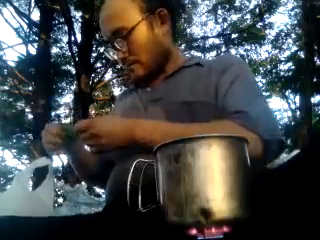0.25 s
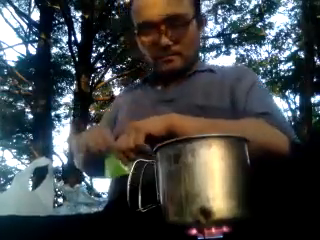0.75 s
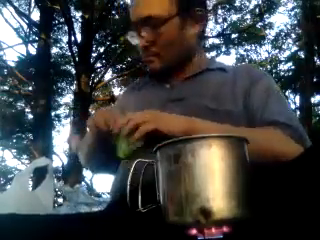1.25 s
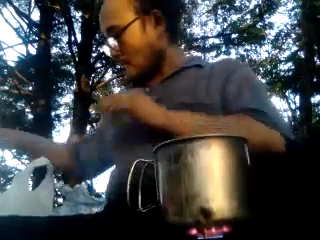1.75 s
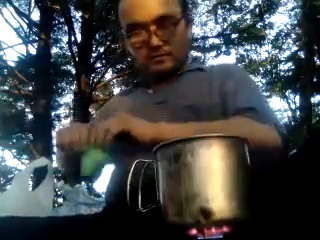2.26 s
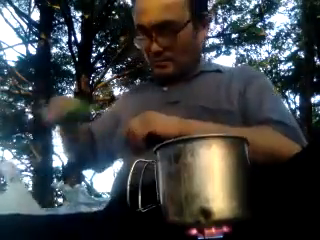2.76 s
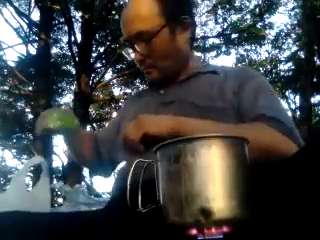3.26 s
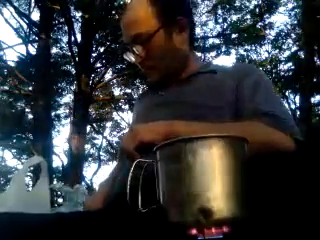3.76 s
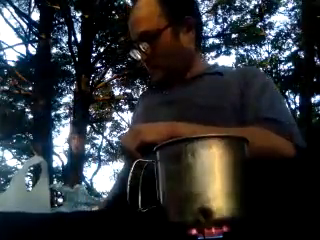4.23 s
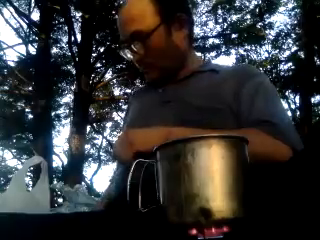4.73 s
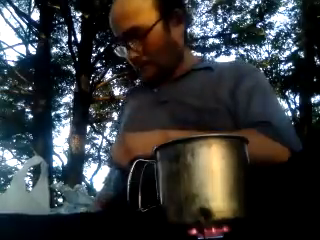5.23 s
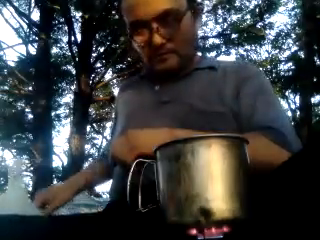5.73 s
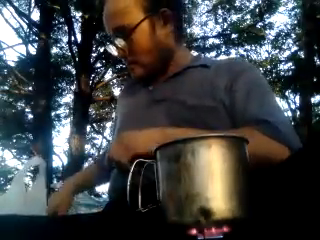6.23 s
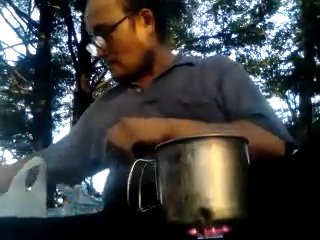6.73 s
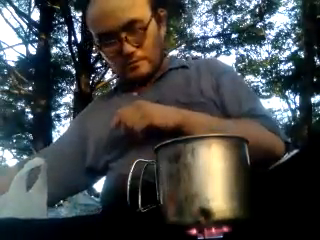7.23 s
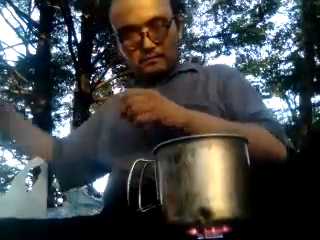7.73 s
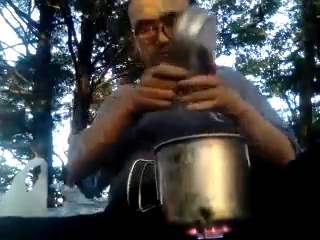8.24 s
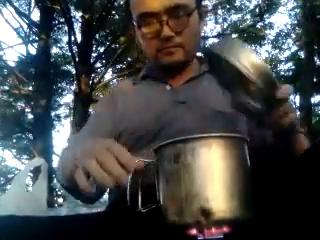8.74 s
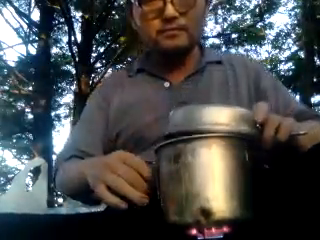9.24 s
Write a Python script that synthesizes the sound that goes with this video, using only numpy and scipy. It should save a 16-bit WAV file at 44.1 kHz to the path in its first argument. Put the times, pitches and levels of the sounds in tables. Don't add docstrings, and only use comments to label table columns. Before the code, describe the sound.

Steady fluttering stove roar with thin gas hiss; crisp foil crackling bursts early, a pause, then light metallic taps and a lid set down.

```python
import sys
import numpy as np
from scipy import signal
from scipy.fft import rfft, irfft, next_fast_len
from scipy.io import wavfile
from scipy.ndimage import uniform_filter1d, minimum_filter1d, map_coordinates

SR = 44100
rng = np.random.default_rng(int(sys.argv[2]) if len(sys.argv) > 2 else 0)


def materialize(psi):
    bounded = np.clip(np.atleast_2d(psi).T, -1, 1)
    quanta = np.round(bounded * 32767).astype(np.int16)
    wavfile.write(sys.argv[1], SR, quanta)


def natural_amplitude(level_db):
    exponent = np.asarray(level_db, float) / 20
    return 10 ** exponent


N = 418068

# pitch_hz, left_db (per Hz), right_db (per Hz), likeness (0-1), right_lead_rad
FLAME_ROAR = [(15, -80, -79, .95, -2.9), (43, -65, -64, 0.95, -2.9), (215, -58, -56, 0.95, -2.9),
              (345, -59, -56, 0.96, -2.8), (475, -68, -65, 0.89, -3.2), (590, -66, -66, 0.99, -3.1),
              (690, -65, -66, 0.93, -2.85), (775, -66, -68, 0.85, -2.6), (950, -64, -63, 0.83, -1.7),
              (1080, -68, -61, 0.78, -1.5), (1250, -82, -67, 0.01, -1.7), (1380, -78, -79, 0.16, -4.4),
              (1510, -73, -73, 0.71, -6.9), (1680, -74, -68, 0.68, -7.2), (2000, -88, -74, 0.22, -5.7),
              (2300, -89, -88, 0.49, -3.1)]
JET_HISS = [(2300, -89, -88, 0.49, -3.1), (2580, -88, -88, 0.76, -3.1), (2900, -82, -81, 0.71, -2.8),
            (3200, -86, -82, 0.34, -0.8), (3450, -84, -74, 0.53, -1.6), (3700, -85, -74, 0.13, -3.9),
            (3950, -83, -72, 0.1, -3.4), (4200, -88, -88, 0.5, -6.2), (4350, -77, -77, 0.93, -3.1),
            (4650, -69, -67, 0.92, -3.0), (4950, -77, -74, 0.6, -2.8), (5150, -79, -69, 0.59, -2.3),
            (5400, -83, -75, 0.38, -2.0), (5750, -91, -74, 0.23, -2.2)]
JET_HISS_UPPER = [(5750, -91, -74, 0.23, -2.2), (6050, -82, -74, 0.4, -2.5), (6450, -92, -71, 0.16, -2.6),
                  (6750, -84, -74, 0.49, -3.0), (6980, -84, -70, 0.62, -2.6), (7150, -85, -81, 0.13, -1.9),
                  (7300, -90, -71, 0.34, -1.7), (7650, -87, -74, 0.39, -2.6), (8000, -95, -70, 0.15, -1.6),
                  (8300, -101, -79, 0.04, -4.4), (8600, -101, -81, 0.03, -1.6), (8950, -101, -88, 0.0, 0.3),
                  (9250, -110, -88, 0.12, 1.8), (9600, -110, -94, 0.06, 1.7)]
# start_s, roar_db, jet_db
BURN_LEVELS = [
    (0.0, 0.5, 1.5),
    (9.48, 0.5, 1.5),
]
# start_s, turn_rad
BODY_LEAN = [(0, 0.67), (1, 0.62), (2.2, 0.72), (3.3, 0.92), (3.8, 0.3), (4.5, 0.23), (5.05, 0.32),
             (5.5, .7), (6.5, .7), (7.5, 0.85), (8.4, 1), (8.7, 0.83), (9.48, .8)]
# pitch_hz, left_db, right_db
FILM_COLOUR = [(670, -68, -80.5), (1230, -66.5, -75), (2027, -75.5, -63.5), (2890, -71.5, -67),
               (3520, -66, -64.5), (4440, -67, -60), (4940, -80.5, -63), (6700, -79, -64.5),
               (7690, -89, -61.5), (8210, -83.5, -61), (8430, -98, -67), (9000, -108, -69),
               (9430, -100, -74), (10210, -117, -95.5)]
# start_s, peak_db, length_ms
CREASES = [(0.0035, -24.5, 1.2), (0.0193, -14.5, 1.17), (0.0293, -23, 1.5), (0.0341, -22, 0.8),
           (0.0469, -19.5, 0.74), (0.0557, -27, 1), (0.0595, -18, 1), (0.0636, -28, 1.2), (0.0697, -32, 0.66),
           (0.0829, -24, 1.0), (0.0915, -19, 2.4), (0.2892, -22.5, 2.1), (0.3443, -31, 1.3),
           (0.6053, -25, 1.2), (0.6213, -16.5, 1.3), (0.63, -28, 0.8), (0.6951, -26, 0.74),
           (0.8909, -29, 1.2), (0.8994, -28, 0.86), (0.9123, -24, 0.9), (0.9657, -21, 0.9),
           (1.0072, -22.5, 1.6), (1.0163, -35, 0.72), (1.0259, -31, 0.9), (1.0475, -31.5, 0.99),
           (1.0514, -26, 1.1), (1.0605, -16.5, 0.92), (1.0779, -23, 0.8), (1.0811, -27, 1.5),
           (1.1034, -19, 0.9), (1.1245, -25, 0.8), (1.1289, -30, 1.9), (1.1357, -17, 1.2),
           (1.1402, -23, 0.93), (1.1966, -24, 1.8), (1.2016, -24, 1.3), (1.3369, -25, 0.8),
           (1.3512, -30, 1.5), (1.3624, -13.5, 2), (1.4951, -21.5, 1.15), (1.5285, -28, 1.2),
           (1.5326, -20.5, 2.3), (1.5456, -25, 1.3), (1.5609, -33, 1.0), (1.5964, -17, 1.1),
           (1.604, -23, 2.4), (1.7381, -28, 1.3), (1.7503, -27, 2.5), (1.801, -19.5, 1.2),
           (1.8635, -17.5, 1.4), (1.9333, -24.5, 2), (1.9454, -25, 1.1), (1.9512, -22.5, 1.1),
           (1.9718, -13, 0.97), (1.9852, -18.5, 1.5), (1.9962, -17, 1.4), (2.0234, -30, 1.9),
           (2.0306, -24, 0.93), (2.1123, -27.5, 1.3), (2.1198, -28, 1.4),
           (2.223, -31, 1.2), (2.2684, -14.5, 1.1), (2.277, -27, 1.5), (2.2918, -24, 0.53),
           (2.2972, -31, 0.9), (2.2995, -23.5, 2.2), (2.3074, -22, 1.8), (2.3159, -16.5, 1.2),
           (2.3245, -20, 0.97), (2.3382, -22, 2.4), (2.348, -17, 1.6), (2.359, -23, 2), (2.3775, -26, 1.7),
           (2.396, -30, 1.5), (2.4257, -16.5, 1.0), (2.5073, -25.5, 1.8), (2.5176, -21.5, 1.5),
           (2.5397, -33, 1.7), (2.5748, -30, 0.8), (2.5912, -24.5, 0.81), (2.601, -27, 1.8),
           (2.6081, -22, 1), (2.6138, -19.5, 0.73), (2.62, -16, 0.47), (2.6267, -32, 1.0),
           (2.6311, -14.5, 0.8), (2.6372, -18.5, 2), (2.652, -28, 1.9), (2.6876, -30, 2.2),
           (2.6988, -19, 1.4), (2.7068, -10.5, 1.2), (2.7103, -13, 1.2), (2.717, -14, 1),
           (2.7888, -12.5, 1.1), (2.7969, -15.5, 1.7), (2.8061, -5.5, 2.6), (2.8599, -14, 0.37),
           (2.863, -12.5, 1.2), (2.8689, -13, 4.2), (2.881, -22, 2.2), (2.893, -20, 2.3),
           (2.938, -27, 0.8), (2.9468, -33, 1.3), (2.9614, -27.5, 0.97), (2.9639, -24, 1.3),
          (2.9687, -19.5, 0.8), (2.9747, -20, 0.8), (2.9813, -20.5, 1.2), (2.9838, -18, 2.5),
          (2.9947, -14, 1.0), (3.0046, -31.5, 1.2), (3.0132, -26, 2.2), (3.017, -27, 0.9),
          (3.0243, -23.5, 0.8), (3.034, -25, 0.8), (3.0455, -23, 1.6), (3.0513, -18.5, 2.4),
          (3.0577, -16, 0.66), (3.0682, -17, 1.0), (3.0876, -26, 1.7), (3.0917, -30, 1.1),
          (3.0982, -25, 1.2), (3.105, -28, 0.81), (3.157, -25, 0.97), (3.1861, -21, 3.4),
          (3.1973, -18, 1.2), (3.2086, -21, 0.8), (3.2633, -18.5, 0.9), (3.2684, -17.5, 0.88),
          (3.2711, -12.5, 2.0), (3.2813, -13, 3.3), (3.2903, -11, 0.72), (3.2941, -9, 0.83),
          (3.297, -20, 1.2), (3.309, -32, 1.0), (3.3516, -14, 0.78), (3.3669, -20, 1.4),
          (3.372, -28.5, 0.8), (3.39, -22, 1.3), (3.3953, -19.5, 0.8), (3.4026, -20.5, 1.2),
          (3.408, -28, 0.9), (3.4221, -31, 1.2), (3.522, -24, 0.73), (3.5282, -26.5, 1), (3.5392, -27, 1.4),
          (3.57, -22.5, 1), (3.577, -27, 1), (3.5913, -28, 1.1), (3.601, -28.5, 1.3), (3.732, -22.5, 1.3),
          (3.7436, -35, 1.3)]
# start_s, peak_db, length_ms
TICKS = [(7.1251, -23, 1.2), (7.1423, -29, 0.72), (7.1477, -26, 0.95), (7.1516, -34, 1.2),
         (7.4021, -15, 0.77), (7.4104, -21, 0.99), (7.4177, -28, 0.71), (7.4267, -28, 1.2),
         (7.4329, -29, 1.1), (7.5654, -25.5, 1.16), (7.71, -23.5, 1.5), (7.7819, -27, 0.7),
         (7.7883, -22, 1.2), (7.7922, -25, 1.1), (7.809, -26, 2.4), (7.8509, -25, 1.8), (7.8581, -24, 1.16),
         (7.9573, -28, 0.99), (7.9707, -22.5, 0.75), (7.9969, -27, 1), (8.1077, -24, 1.5),
         (8.1864, -33, 1.6), (8.1926, -28, 1), (8.198, -34, 0.83), (8.2375, -19.5, 3.3),
         (8.2493, -25.5, 0.74), (8.2706, -27, 1.2), (8.275, -27.5, 1.5), (8.3526, -27, 1.5),
         (8.3801, -31, 1.2), (8.3857, -22.5, 1.4), (8.4029, -26, 1.4), (8.4372, -26, 0.72),
         (8.4411, -25, 1.7), (8.4632, -23, 1.7), (8.467, -27, 1.4), (8.498, -29, 0.54),
         (8.5517, -13.5, 1.8), (8.5613, -30, 0.8), (8.5674, -24, 1.2), (8.6267, -26, 1.3),
         (8.9392, -29, 1.3), (9.0892, -25, 2.1), (9.4017, -28, 2.4), (9.4119, -23, 1.5)]
# start_s, length_s, level_db
SQUEEZES = [(0, 0.11, -43), (.27, 0.11, -50), (0.596, 0.11, -45), (0.894, 0.26, -51.5), (1.325, 0.033, -46),
            (1.478, 0.17, -50.5), (1.725, 0.16, -47.5), (1.94, 0.055, -46), (2.298, 0.04, -41),
            (2.399, .13, -52.5), (2.589, 0.052, -40.5), (2.701, 0.015, -32.5), (2.787, 0.018, -30),
            (2.859, 0.015, -33.5), (2.96, 0.039, -36.5), (3.039, 0.04, -39), (3.081, 0.026, -47),
            (3.17, 0.038, -48), (3.261, .012, -35), (3.279, .02, -34.5), (3.349, 0.01, -30.5),
            (3.365, 0.045, -46.5), (3.514, 0.055, -47.5), (3.6, 0.24, -57), (7.12, 0.04, -52.5),
            (7.398, 0.037, -43), (7.56, 0.018, -47.5), (7.775, 0.099, -52), (7.955, 0.031, -52),
            (8.1, 0.024, -52), (8.18, 0.1, -50), (8.35, 0.12, -50.5), (8.55, 0.016, -49)]
# pitch_hz, level_db, t60_s
LID_MODES = [(660.5, 2.5, 0.076), (1280, -1, 0.11), (1500, -8.5, 0.085), (1937, -9.5, 0.056),
             (2000, -4.5, 0.12), (2640, -14.5, 0.1), (3120, -24.5, 0.048), (3770, -4, 0.12),
             (4860, -1, 0.041), (5740, -7, 0.29), (7150, -1.5, 0.12), (7900, -2.5, 0.024)]
# pitch_hz, level_db, t60_s
POT_MODES = [(646, 3.5, .09), (1280, -5, .08), (1670, -6, 0.066), (2020, -21, 0.085), (2670, -18, 0.098),
             (3200, -11, .08), (3550, -4, .1)]
# start_s, level_db, best_excited_hz, push_ms
LID_CONTACTS = [(7.06, -30.5, 1480, 3.6), (7.137, -24.5, 1300, 1.5), (7.297, -32.5, 700, 3.2),
                (7.31, -30.5, 644, 5), (7.399, -23.5, 1430, 7.4), (7.533, -28.5, 897, 1.6),
                (7.97, -22, 2780, 1.3), (7.999, -31.5, 3540, 3.6), (8.108, -31, 3700, 1.6),
                (8.235, -30, 4600, 4.2), (8.382, -29.5, 5500, 2.8), (8.402, -39, 5700, 2.3),
                (8.461, -29.5, 5670, 1.2), (8.553, -29.5, 4000, 0.26), (9.09, -32.5, 2660, 2.4),
                (9.398, -19, 790, 18), (9.408, -20.5, 1710, 6)]
# pitch_hz, margin_db
ROUNDING_MARGIN = [(0, -26), (250, -16), (580, .5), (700, -4), (1500, 0), (2400, 1), (3200, 3.5), (4400, 7),
                   (5200, 6.5), (8000, 6.5), (11000, 7)]

PUFF_HZ, PUFF_DB = 190.8, 3.5
ECHO_HZ, ECHO_WIDTH_HZ, ECHO_GAIN = 4554, 450, .4
GRIP_S, LET_GO_S = .002, .005
CREASE_HZ, TICK_HZ, CREASE_SPREAD = 5500, 6700, 0.12
POP_DB = 5
FINGERS_FROM_S = TICKS[0][0] - .1
POT_FROM_S = 9.2
CEILING = .98
TOP_HZ = 10160
SUDDEN_DB = 8


def unit(x):
    return x / np.sqrt(np.mean(x ** 2) + 1e-20)


def columns(rows, x):
    first, *cols = np.transpose(rows)
    return [np.interp(x, first, c) for c in cols]


def wobble(rate):
    knots = rng.standard_normal(int(N * rate / SR) + 4)
    return map_coordinates(knots, [np.arange(N) * rate / SR])


def filtered(x, response):
    m = next_fast_len(N + 8192)
    return irfft(rfft(x, m) * response(np.fft.rfftfreq(m, 1 / SR)), m)[..., :N]


def burner():
    t = np.arange(N) / SR
    roar_db, jet_db = columns(BURN_LEVELS, t)
    flutter = wobble(8)
    roar = ports(FLAME_ROAR, patchy(patchy_db=1.66))
    roar = natural_amplitude(roar_db + .8 * flutter + 0.55 * wobble(16)) * roar
    lean, = columns(BODY_LEAN, t)
    jet = ports(JET_HISS + JET_HISS_UPPER[1:], patchy(patchy_db=2.0), lean, beyond_hz=150)
    bass = filtered(roar, lambda hz: 1 / (1 + (hz / PUFF_HZ) ** 4))
    roar = roar + bass * (natural_amplitude(PUFF_DB * wobble(12) - 0.83) - 1)
    return roar + natural_amplitude(jet_db + .3 * flutter + 0.28 * wobble(30)) * jet


def patchy(patchy_db):
    z = signal.stft(rng.standard_normal((2, N + 512)), nperseg=512)[2]
    field = uniform_filter1d(rng.standard_normal(z.shape[1:]), size=5, axis=0)
    field = uniform_filter1d(field, size=10, axis=1)
    return unit(signal.istft(z * natural_amplitude(patchy_db * unit(field)), nperseg=512)[1][:, :N])


def ports(table, pair, turn=None, beyond_hz=0):
    count = 3 if turn is None else 6

    def response(hz):
        left_db, right_db, alike, lead = columns(table, hz)
        alike = np.clip(alike, 0, 1)
        inside = np.sqrt(SR / 2) * (hz >= table[0][0]) * (hz < table[-1][0] + beyond_hz)
        shared = natural_amplitude(left_db) * alike * np.exp(-1j * lead)
        own = natural_amplitude(left_db) * np.sqrt(1 - alike ** 2)
        band = np.exp(-((hz - ECHO_HZ) / ECHO_WIDTH_HZ) ** 4)
        layers = [shared, natural_amplitude(right_db), own, band * shared, -1j * band * shared, band * natural_amplitude(right_db)]
        return inside * np.array(layers[:count])

    shared_left, right, own_left, *echo = filtered(pair[[0, 0, 1, 0, 0, 0][:count]], response)
    if echo:
        shared_left = shared_left + (np.cos(turn) - 1) * echo[0] + np.sin(turn) * echo[1]
        right = right + ECHO_GAIN * turn * echo[2]
    return np.array([shared_left + own_left, right])


def film():
    crackle = crease_pops() + rustle()
    alike = 0.56

    def response(hz):
        left_db, right_db = columns(FILM_COLOUR, hz)
        late = -np.exp(-2j * np.pi * hz * 0.000511)
        own = natural_amplitude(left_db) * np.sqrt(1 - alike ** 2)
        return natural_amplitude(66.5) * np.array([natural_amplitude(left_db) * alike * late, natural_amplitude(right_db), own])

    shared_left, right, own_left = filtered(crackle[[0, 0, 1]], response)
    return np.array([shared_left + own_left, right])


def crease_pops():
    pops = np.zeros((2, N + 4096))
    lead_s = .02
    hz, u = np.fft.rfftfreq(2048, 1 / SR), np.arange(2048) / SR - lead_s
    heard = natural_amplitude(66.0 + columns(FILM_COLOUR, hz)[1])
    for s, db, ms in CREASES + TICKS:
        typical_hz, slope_db, far_db = CREASE_HZ, 6.5, 0
        if s >= FINGERS_FROM_S:
            typical_hz, slope_db, far_db = TICK_HZ, 11, .3
        centre_hz = typical_hz * 2 ** (CREASE_SPREAD * rng.standard_normal())
        resonances_db = 4 * np.repeat(rng.standard_normal(41), repeats=25)
        tint = natural_amplitude(-slope_db * np.abs(np.log2((hz + 1) / centre_hz)) + resonances_db)
        late = u - .0006 * ms
        width_s = np.where(late < 0, .0004, .0007) * max(ms, .5)
        shape = np.exp(-.5 * (late / width_s) ** 2)
        burst = irfft(rfft(rng.standard_normal((2, 2048))) * tint) * shape
        peak = np.abs(irfft(rfft(burst[0]) * heard)).max()
        pops[:, round(s * SR):][:, :2048] += natural_amplitude(db + POP_DB + far_db) * burst / peak
    return pops[:, round(lead_s * SR):][:, :N]


def rustle():
    t, effort = np.arange(0, N, 32) / SR, 0
    for s, length, db in SQUEEZES:
        before, after = np.maximum(s - t, 0), np.maximum(t - s - length, 0)
        effort = effort + natural_amplitude(db) * np.exp(-before / GRIP_S - after / LET_GO_S)
    grit = rng.standard_normal((2, N))
    fingers = round(FINGERS_FROM_S * SR)
    bright = unit(filtered(grit, lambda hz: np.exp(-((hz - TICK_HZ) / 2600) ** 2)))
    grit[:, fingers:] = bright[:, fingers:] * natural_amplitude(-.5)
    sparks = (rng.random(N) < 700 / SR) * natural_amplitude(3.1 * np.minimum(rng.exponential(size=N), 2.5))
    clumps = np.sqrt(np.abs(uniform_filter1d(sparks ** 2, size=28))) * natural_amplitude(2.6 * wobble(90))
    return natural_amplitude(11.0) * np.repeat(effort, repeats=32)[:N] * unit(clumps) * grit


def lid():
    out, t = np.zeros((2, N + SR)), np.arange(SR // 4) / SR
    late_s = np.array([[.00035], [0]])
    for s, db, best_hz, ms in LID_CONTACTS:
        swell = np.sin(np.pi / 2 * np.minimum(t / (0.0011 * ms), 1)) ** 2
        after = np.maximum(t - 0.00075 * ms, 0)
        ring = 0
        for hz, level, t60 in (POT_MODES if s > POT_FROM_S else LID_MODES):
            struck_db = level - 8.1 * abs(np.log2(hz / best_hz)) + rng.normal(0, 1.1)
            decay_db = 60 * after * (1 + ms / 12) / t60
            port_db = np.array([[-3 - 4 * hz / 1500], [0]])
            ring = ring + natural_amplitude(struck_db - decay_db + port_db) * np.sin(2 * np.pi * hz * (t - late_s))
        out[:, round(s * SR):][:, :len(t)] += natural_amplitude(db + 5.5) * swell * ring
    return out[:, :N]


def scene():
    return burner() + film() + lid()


def band_power(c, count):
    return np.mean(c.reshape(2, c.shape[1], -1, count) ** 2, axis=3)


def spectral_rounding(x, floor_db, jitter_db, size=1024, count=8):
    n = np.arange(2 * size) + .5
    window = np.sqrt(2 / size) * np.sin(np.pi * n / (2 * size))
    basis = window[:, None] * np.cos(np.pi / size * np.outer(n + size / 2, n[:size // 2]))
    frames = N // size + 2
    blocks = np.pad(x, ((0, 0), (size, frames * size - N))).reshape(2, frames + 1, size)
    c = np.concatenate([blocks[:, :-1], blocks[:, 1:]], axis=2) @ basis
    turn = np.array([[1, 1], [1, -1]]) / np.sqrt(2)
    paired = np.tensordot(turn, c, axes=1)
    power = uniform_filter1d(band_power(c, count), size=3, axis=1)
    paired_power = uniform_filter1d(band_power(paired, count), size=3, axis=1)
    joint = paired_power.min(axis=0) < power.min(axis=0)
    masking = uniform_filter1d(power, size=5, axis=2)
    masking = minimum_filter1d(masking, size=5, axis=1)
    masking = np.minimum(masking, 1.7 * uniform_filter1d(band_power(c, count), size=9, axis=2))
    masking = np.where(joint, masking.mean(axis=0), masking)
    drift = uniform_filter1d(rng.standard_normal(masking.shape[1:]), size=11, axis=0)
    drift = unit(uniform_filter1d(drift, size=3, axis=1))
    margin_db = columns(ROUNDING_MARGIN, np.linspace(0, SR / 4, masking.shape[2]))[0]
    step = np.sqrt(np.abs(masking) * natural_amplitude(margin_db) ** 2 + natural_amplitude(floor_db) ** 2)
    step = step * natural_amplitude(jitter_db * (.65 * rng.standard_normal(masking.shape) + .95 * drift))
    step, joint = np.repeat(step, count, axis=2), np.repeat(joint, count, axis=1)
    c = np.where(joint, paired, c) / step
    c = np.sign(c) * np.floor(np.abs(c) + .4) * step
    y = np.where(joint, np.tensordot(turn, c, axes=1), c) @ basis.T
    return (y[:, 1:, :size] + y[:, :-1, size:]).reshape(2, -1)[:, :N]


def roll_off(x):
    return signal.sosfilt(signal.butter(12, 10850, fs=SR, output="sos"), x)


def record(dry):
    x = dry / (1 + np.abs(dry / CEILING) ** 8) ** (1 / 8)
    x = filtered(x, lambda hz: hz ** 2 / (hz ** 2 + 28 ** 2) / (1 + (hz / TOP_HZ) ** 30))
    power = np.diff(x[1], prepend=0) ** 2
    usual = uniform_filter1d(power, size=3000)
    sudden = uniform_filter1d(power, size=100) > natural_amplitude(SUDDEN_DB) ** 2 * usual
    fine = uniform_filter1d(-minimum_filter1d(-1. * sudden, size=1000), size=300)
    mix = fine * x + (1 - fine) * spectral_rounding(x, floor_db=-36.5, jitter_db=2.3)
    return roll_off(mix)


dry = scene()
out = record(dry)
materialize(out)
```